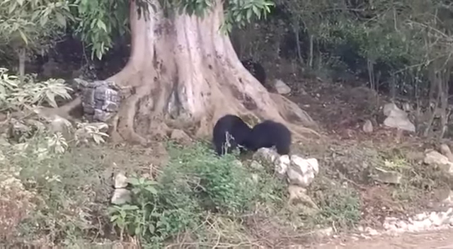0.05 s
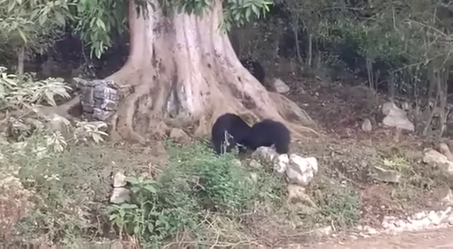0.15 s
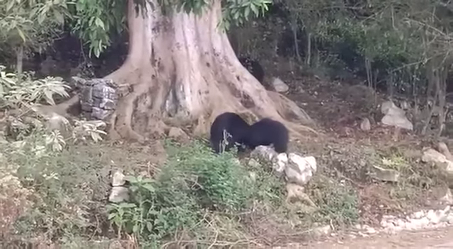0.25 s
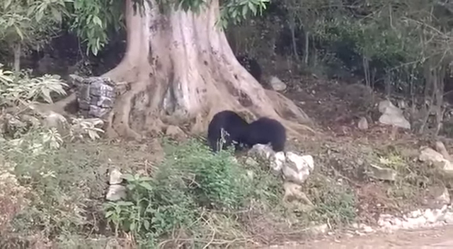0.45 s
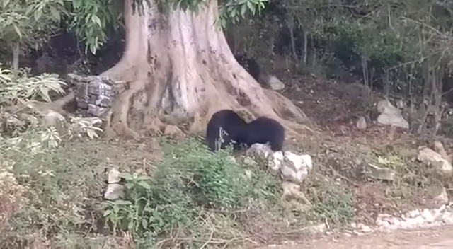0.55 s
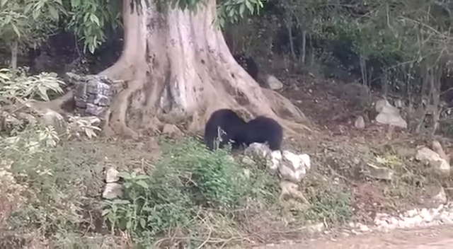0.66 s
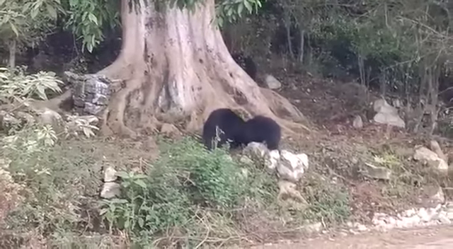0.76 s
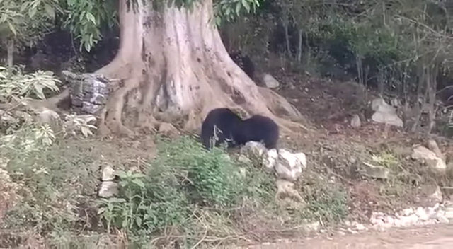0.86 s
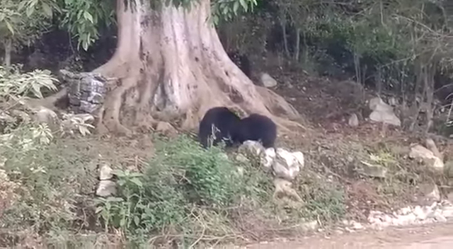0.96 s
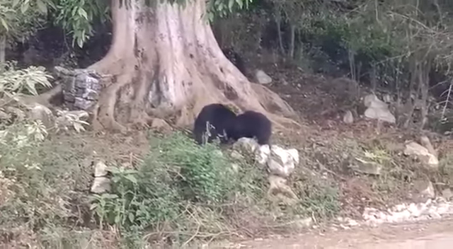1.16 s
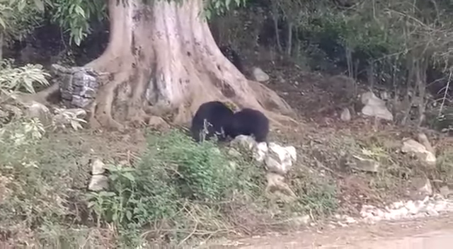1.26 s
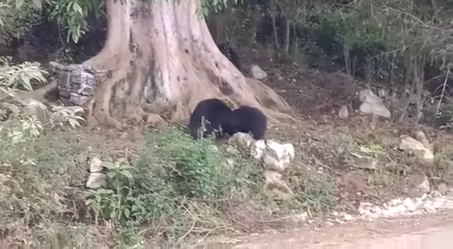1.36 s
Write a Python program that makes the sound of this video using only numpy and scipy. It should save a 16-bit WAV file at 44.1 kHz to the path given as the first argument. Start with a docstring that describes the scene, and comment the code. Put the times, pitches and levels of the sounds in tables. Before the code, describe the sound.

A songbird close to the microphone sings one quick phrase of bright, mostly falling chirps, a little to the left. Fainter birds then answer from farther off on a wooded hillside, over a low, steady background of open air.

```python
"""A wooded hillside, heard through a stereo microphone. Close by, a songbird sings one quick phrase of
slurred, mostly falling whistles from both sides of its voice box; trunks and slope scatter it back.
A small bird whistles thinly above it. Farther birds answer, and their chorus blurs into a bright wash.
Behind them: faint low tones, one dry tick, a thin insect hiss and the low murmur of the open air."""
import sys
import numpy as np
from scipy import signal
from scipy.fft import rfft, irfft, next_fast_len
from scipy.io import wavfile
from scipy.ndimage import uniform_filter1d, map_coordinates

SR = 44100
rng = np.random.default_rng(int(sys.argv[2]) if len(sys.argv) > 2 else 0)


def materialize(psi):
    """Save the field psi as 16-bit PCM at rate SR to the path in sys.argv[1].

    A 1-D psi becomes a single channel; in a 2-D psi each row is a channel.
    """
    bounded = np.clip(np.atleast_2d(psi).T, -1, 1)
    quanta = np.round(bounded * 32767).astype(np.int16)
    wavfile.write(sys.argv[1], SR, quanta)


N = 61739

# Songbird near the microphone, heard stronger but slightly later on the left.
# Note columns: start t/s, length/s, onset f/Hz, held f/Hz, settling/s, attack/s, level/dB,
# swell over the note/dB, warble/share of pitch, left over right/dB
NEAR_NOTES = [ (.221, 0.029, 2550, 2907, 0.0073, 0.0048, -32, -4, 0.058, 5.5),
              (.2555, .036, 3713, 2971, 0.00099, .005, -22, 3, .02, 7.5),
              (.294, 0.016, 3025, 3037, 0.0064, 0.0084, -32.5, -10.5, .01, 16),
              (.311, 0.044, 3000, 2115, 0.0057, 0.011, -29.5, -8.5, .02, 7.5),
              (.383, 0.034, 3147, 3525, 0.0094, 0.014, -43, 4.5, .07, 6.5),
              (.403, 0.042, 3775, 2800, .008, 0.011, -24, 0, 0.015, 7.5),
              (.438, 0.041, 2854, 2424, .004, 0.0079, -25.5, 0.5, .05, 11.5),
              (.480, .030, 2440, 2382, 0.0063, .012, -22.5, 1.5, 0.0024, 11.5),
              (.555, 0.031, 3140, 3252, 0.0026, 0.0071, -29.5, 4.5, 0.0015, 4.5),
              (.619, 0.011, 1900, 2145, 0.0036, 0.005, -34, -13, .06, 12),
              (.627, 0.034, 2100, 2167, 0.0064, 0.0085, -25, 0.5, .003, 10),
              (.670, 0.039, 1672, 1834, 0.0067, 0.0058, -41.5, -1, 0.021, 7),
              (.700, 0.022, 1710, 1383, 0.0057, 0.0034, -48, -11.5, 0.039, 6.5)]
# Same bird, the second side of its voice box joining in briefly (note columns)
SECOND_VOICE_NOTES = [(.420, .018, 1547, 1728, .007, .007, -46.5, 0.21, 0.014, 4),
                      (.441, 0.024, 2950, 2695, .012, .008, -27.5, 1, 0.0301, 8.7)]
def near_bird(left_lag_s=.00056):
    """One phrase from both sides of the voice box; it arrives a little later, but stronger, on the left."""
    voice = whistles(NEAR_NOTES) + whistles(SECOND_VOICE_NOTES)
    song = hillside(voice, scatter_db=-13, tail_db=-15.5)
    return filtered(song, lambda hz: np.exp(-2j * np.pi * hz * np.array([[left_lag_s], [0]])))


# Partials 2 to 5 of a whistle, before colouring: level/dB against the fundamental
PARTIALS_DB = [-46, -52, -67, -62]
# Colouring of those partials: f/Hz, gain/dB
PARTIAL_COLOUR = [(4300, -15.5), (4800, -3.5), (5700, 5), (7000, -5.5), (9000, -3.5), (9900, 3.5),
                  (11000, -11.5), (14000, -1)]
def whistles(notes, warble_hz=135, flutter_db=3, flutter_rate=220, release_share=.45):
    """Each note is a near-pure tone that slides onto its held pitch, warbling and swelling or fading."""
    out = np.zeros((2, N))
    for start, length, onset_hz, held_hz, settle, attack, db, swell_db, warble, pan_db in notes:
        t = np.clip(np.arange(N) / SR - start, 0, length)
        waver = np.sin(2 * np.pi * warble_hz * t) + .5 * wobble(flutter_rate)
        hz = (held_hz + (onset_hz - held_hz) * np.exp(-t / settle)) * (1 + warble * waver)
        phase = 2 * np.pi * np.cumsum(hz) / SR
        tone = np.sin(phase)
        for k, partial_db in enumerate(PARTIALS_DB, 2):
            tone += amp(partial_db + along(PARTIAL_COLOUR, k * hz)) * np.sin(k * phase)
        ramp = np.minimum(t / attack, (1 - t / length) / release_share)
        gate = np.sin(np.pi / 2 * np.clip(ramp, 0, 1))
        level_db = db + swell_db * (t / length - .5) + flutter_db * wobble(flutter_rate)
        out += panned(pan_db) * np.sqrt(2) * tone * gate * amp(level_db)
    return out


# Echoes off the slope and the nearest trunks: delay t/s, left level/dB, right level/dB
SLOPE_ECHOES = [(.024, -11, -21), (.052, -19, -22.5), (.096, -43, -31.5)]
# Reverberation of the wood around the microphone: f/Hz, time to fall 60 dB/s
WOOD_DECAY = [(1300, 0.21), (2200, 0.81), (3200, 0.85), (5000, 1), (10000, 0.37)]
def hillside(x, scatter_db, tail_db, scatter_t60_s=.099):
    """The direct sound, a few distinct echoes, quick scatter from undergrowth and the wood's long tail."""
    hz, frame_s, bands = signal.stft(rng.standard_normal((2, SR)), SR, nperseg=256)
    tail = signal.istft(bands * amp(-60 * frame_s / along(WOOD_DECAY, hz)[:, None]))[1][:, :SR]
    t = np.arange(SR) / SR
    scatter = rng.standard_normal((2, SR)) * amp(-60 * t / scatter_t60_s)
    response = amp(scatter_db) * unit(scatter * (1 - np.exp(-t / .008)))
    response += amp(tail_db) * unit(tail * (1 - np.exp(-t / .03)))  # the tail builds more slowly
    diffuse = signal.fftconvolve(x.mean(0)[None], response / np.sqrt(SR), axes=1)[:, :N]
    echoes = filtered(x, lambda f: sum(amp([[left], [right]]) * np.exp(-2j * np.pi * f * delay)
                                       for delay, left, right in SLOPE_ECHOES))
    return x + echoes + panned(db=2) * diffuse


# Small bird with a high voice, faint at the microphone (note columns)
SMALL_BIRD_NOTES = [ (.185, 0.13, 4003, 3950, 0.024, .01, -59, 12, .003, 2),
                    (.908, 0.096, 4530, 4364, 0.049, .01, -69.5, 7.5, 0.0046, 2.5),
                    (.932, 0.097, 4035, 3945, 0.0235, 0.014, -58, 20, 0.0037, 3.9),
                    (1.035, 0.035, 4181, 3100, 0.044, 0.012, -60, -7, 0.0037, 2.5),
                    (1.218, 0.072, 5090, 4547, 0.02, 0.012, -70, 19, 0.00188, 4.6),
                    (1.285, 0.036, 4423, 5340, 0.046, 0.0038, -70.5, -1, .002, 1.7),
                    (1.325, 0.036, 5220, 5610, 0.0059, 0.0055, -68.5, 1, .004, 2.3)]
def small_bird():
    """Thin, drawn-out whistles above the others."""
    return hillside(whistles(SMALL_BIRD_NOTES), scatter_db=-5.5, tail_db=-6)


# Birds farther off in the wood, heard stronger on the left (note columns)
FAR_CALLS = [ (.085, 0.046, 2867, 2440, 0.0079, .01, -66, 8, 0.019, 1.9),
             (.738, .04, 2890, 2763, 0.0065, 0.0088, -50.5, 1, 0.011, 5.5),
             (1.076, 0.043, 2396, 2854, .018, .008, -50, 1.8, .03, 8.1),
             (1.118, 0.022, 2732, 2530, 0.0052, .008, -45.5, 9, .02, 9.5),
             (1.135, .022, 2360, 2002, 0.0063, 0.0033, -50.5, 0, .015, 12),
             (1.172, 0.017, 2450, 2260, .005, 0.005, -59.5, 0, 0.012, 4.6),
             (1.252, .03, 3326, 3390, 0.012, 0.0077, -62, 0, 0.0069, 3),
             (1.300, 0.019, 3017, 2890, 0.0043, .01, -56.5, 0, 0.01, 2.6),
             (1.325, .048, 2300, 2235, 0.0064, 0.011, -54.5, 0.074, .008, 3.4),
             (1.358, 0.031, 3380, 3440, 0.0068, 0.014, -63, 0, 0.0093, 3),
             (1.365, 0.042, 2240, 2006, 0.0066, 0.018, -55, 0.23, 0.017, 6.1)]
def far_birds():
    """Single short calls, blurred by the wood on their way."""
    return hillside(whistles(FAR_CALLS), scatter_db=-7, tail_db=-8)


# Chorus from still farther away: f/Hz, relative level/dB
CHORUS_SPECTRUM = [(1200, -48), (1650, -10), (2000, -4.5), (2400, 4), (2900, -0.5), (3300, -8),
                   (3800, -14.5), (4600, -49.5)]
# Its rise and fall at the microphone: t/s, level/dB
CHORUS_SWELLS = [(0, -54), (.1, -56), (0.178, -61.5), (0.499, -55), (.85, -52), (.92, -57), (1.02, -52.5),
                 (1.221, -57.5), (1.31, -48.5), (1.4, -52)]
def chorus():
    """Many distant birds merge into a bright wash of noise."""
    level_db = np.interp(np.arange(N) / SR, *np.transpose(CHORUS_SWELLS))
    return panned(db=7) * amp(level_db) * rush(CHORUS_SPECTRUM, patchy_db=1.5)


# Low tones far from the microphone (note columns)
DISTANT_LOW_NOTES = [ (.228, 0.056, 623.7, 730, 0.027, 0.022, -65, 0, .01, 0.0022),
                     (.455, 0.1, 1013, 977, .03, 0.016, -71, 0, .005, 0),
                     (.715, 0.04, 355.5, 336, 0.023, 0.014, -73, 0, 0.0082, 0),
                     (1.04, 0.18, 760, 645, .09, 0.025, -75.5, 0, 0.016, 0)]
def low_tones():
    """A few faint, low glides carried through the wood."""
    return hillside(whistles(DISTANT_LOW_NOTES), scatter_db=-7.5, tail_db=-12)


# A tick, as it reaches the microphone: f/Hz, relative level/dB
TICK_SPECTRUM = [(1500, -30), (4000, 1.5), (7000, -6), (8500, -26), (14000, -28)]
def tick(start_s=.876, db=-56.5, t60_s=.026):
    """A faint dry tick, perhaps a twig: a burst of noise that dies at once."""
    t = np.arange(N) / SR - start_s
    return (t > 0) * amp(db - 60 * abs(t) / t60_s) * rush(TICK_SPECTRUM, patchy_db=-2.5)


# Insects all around the microphone: f/Hz, relative level/dB
INSECT_SPECTRUM = [(4500, -44), (5400, -9.5), (6100, -2.5), (6700, 2.5), (7200, -2), (7700, -28.5),
                   (9000, -61)]
def insects():
    """A thin, high hiss of insects that shimmers at a steady overall level."""
    return panned(db=1.5) * amp(-67.5) * rush(INSECT_SPECTRUM, patchy_db=4.5)


# Open air over the hillside, behind everything else: f/Hz, relative level/dB
AIR_SPECTRUM = [(22, -30.5), (35, -20), (50, -8.5), (75, -4), (130, -1), (250, -4), (450, -5), (680, -1),
                (900, -6), (1300, -7.5), (3000, -10), (5000, -14), (7000, -38.5), (9000, -40), (15000, -28)]
def open_air(midway_db=-65.5, rise_db_per_s=1):
    """The low murmur of the open air, slowly growing."""
    level_db = midway_db + rise_db_per_s * (np.arange(N) - N / 2) / SR
    return amp(level_db) * rush(AIR_SPECTRUM, patchy_db=1.3)


# How alike diffuse sound is on the microphone's two sides: f/Hz, left-right correlation
STEREO_LIKENESS = [(60, 1), (250, 0.73), (600, .3), (2000, 0), (8000, 0.084)]
def rush(spectrum, patchy_db):
    """Stereo noise of rms 1 with patches of random gain, centred in the bass and wide in the treble."""
    def mid_side_gains(hz):
        angle = np.arccos(np.clip(along(STEREO_LIKENESS, hz), -1, 1)) / 2
        return amp(along(spectrum, hz)) * [np.cos(angle), np.sin(angle)]

    bands = signal.stft(rng.standard_normal((2, N)), nperseg=512)[2]
    patches = uniform_filter1d(rng.standard_normal(bands.shape[1:]), size=3, axis=0)  # across pitch
    patches = uniform_filter1d(patches, size=9, axis=1)  # across time
    noise = signal.istft(bands * amp(patchy_db * unit(patches)))[1][:, :N]
    mid, side = filtered(noise, mid_side_gains)
    return unit(np.array([mid + side, mid - side]))


def amp(db):
    """Decibels to gain."""
    return 10 ** (np.asarray(db) / 20)


def unit(x):
    """Scale to rms 1."""
    return x / np.sqrt(np.mean(x ** 2) + 1e-20)


def along(points, hz):
    """Interpolate (f/Hz, value) points on a log frequency axis."""
    f, values = np.transpose(points)
    return np.interp(np.log(hz + 1), np.log(f + 1), values)


def panned(db):
    """Left and right gains of mean power 1, the left stronger by db."""
    return unit(amp([[db / 2], [-db / 2]]))


def wobble(rate):
    """A smooth random curve, rate knots a second."""
    return map_coordinates(rng.standard_normal(N), [np.arange(N) * rate / SR], mode="mirror")


def filtered(x, response):
    """Multiply the spectrum of x by response(f/Hz)."""
    size = next_fast_len(N + SR // 2)
    return irfft(rfft(x, size) * response(np.fft.rfftfreq(size, 1 / SR)), size)[..., :N]


def scene():
    """Everything that reaches the microphone, from the near bird back to the open air."""
    birds = near_bird() + small_bird() + far_birds() + chorus()
    return birds + low_tones() + tick() + insects() + open_air()


def record(dry):
    """The microphone keeps nothing above its band limit of 15 kHz."""
    return filtered(dry, lambda hz: hz < 15000)


dry = scene()
out = record(dry)
materialize(out)
```